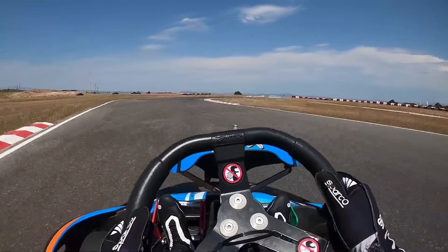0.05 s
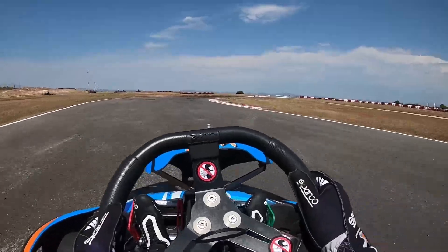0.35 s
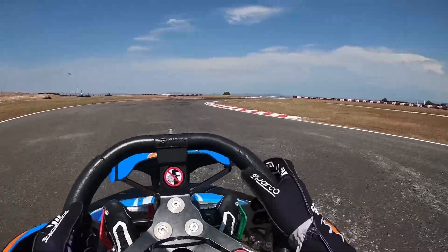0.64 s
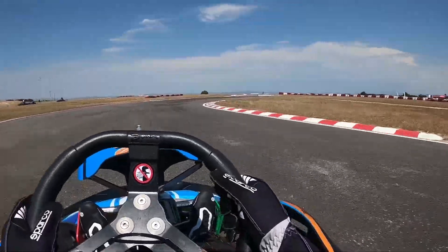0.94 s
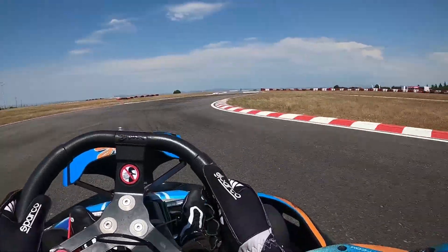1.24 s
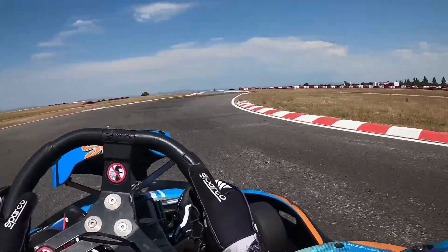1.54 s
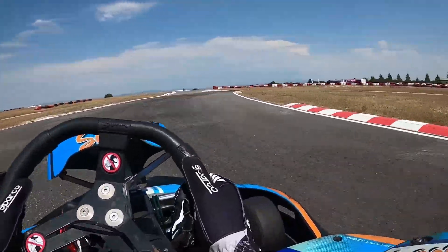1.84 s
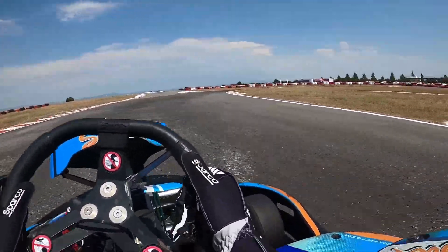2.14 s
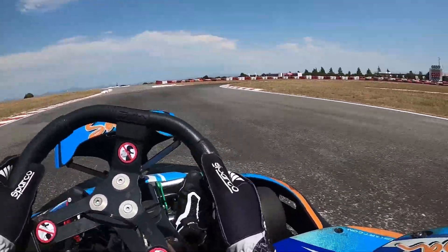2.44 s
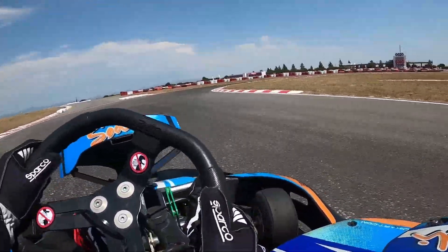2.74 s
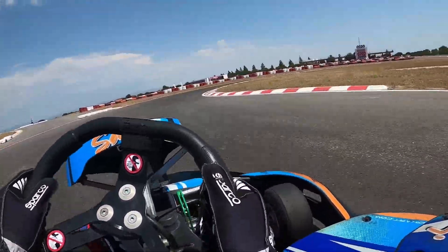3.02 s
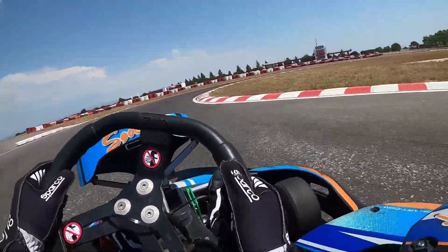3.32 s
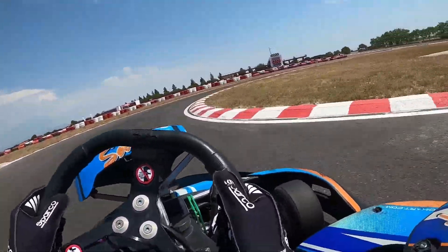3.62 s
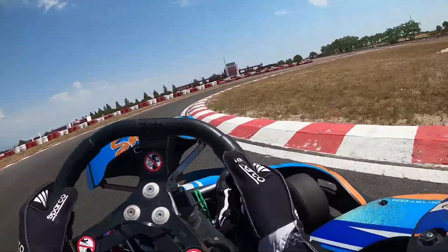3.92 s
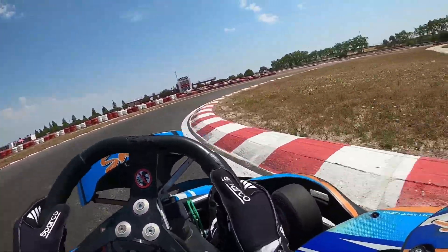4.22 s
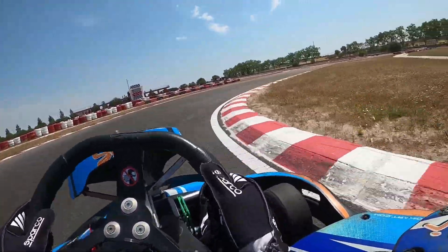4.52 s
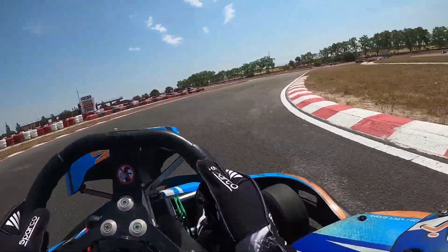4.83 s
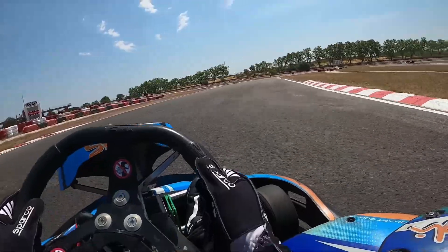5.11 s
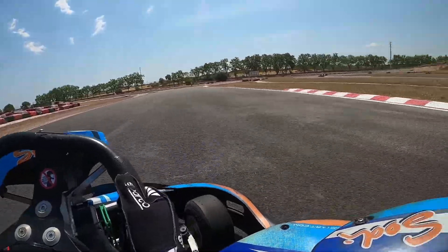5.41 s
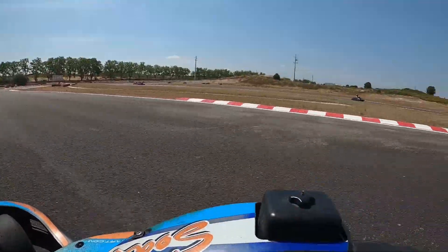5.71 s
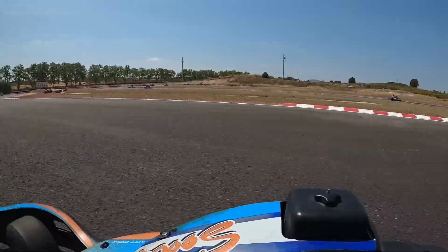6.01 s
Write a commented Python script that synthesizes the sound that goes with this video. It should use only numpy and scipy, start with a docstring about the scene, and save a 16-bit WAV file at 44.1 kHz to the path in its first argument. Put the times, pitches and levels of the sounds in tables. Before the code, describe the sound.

A small racing kart engine throbs throughout, heard on board in the open air, with heavy wind buffeting the microphone and tyres roaring on asphalt. In the first second the chain whines clearly and the frame booms over bumps. The engine rises slightly until about 2 seconds, then drops in pitch, gulps twice and settles into a hollow drone from about 3 seconds. Short, rough, high tyre squeals begin around 1.7 seconds and repeat in a stuttering run, strongest from 3 to 4.5 seconds and gone by 5. Very faint brake hisses come just before 3 seconds, and light grit ticks and scattered plastic knocks dot the corner. A faint, thin whistle lasts from about 4.7 to 5.5 seconds. The plastic bodywork rattles hardest from 5.7 to 6 seconds, as the wind and engine continue.

```python
"""A four-stroke engine throbs under buffeting wind, heard on board a racing kart on a short straight.
Its firings excite resonances of exhaust, fins and airbox and shake the frame; the chain whines, the
tread roars, bumps boom and grit ticks. Off the throttle, through a long corner, the brake pads hiss
and the loaded tyres squeal by stick-slip friction each time the hopping chassis bites.
At the exit the plastic bodywork rattles hardest."""
import sys
import numpy as np
from scipy import signal
from scipy.fft import rfft, irfft, next_fast_len
from scipy.io import wavfile
from scipy.ndimage import uniform_filter1d, map_coordinates

SR = 44100
rng = np.random.default_rng(int(sys.argv[2]) if len(sys.argv) > 2 else 0)


def dump(signal):
    """Clip the signal to [-1, 1] and save it as 16-bit WAV at the path in sys.argv[1]."""
    limited = np.clip(np.atleast_2d(signal).T, -1, 1)
    pcm = np.round(limited * 32767).astype(np.int16)
    wavfile.write(sys.argv[1], SR, pcm)


N = 271656
TIME = np.arange(N) / SR

# engine speed (the crank turns twice per firing): time_s, firing_hz
FIRING_RATE = [(0, 35.15), (.95, 35.65), (1.75, 36.95), (2.1, 36.7), (2.35, 32.3), (3.0, 32.1),
               (3.12, 30.85), (3.33, 30.6), (3.52, 30.0), (3.8, 29.95), (4.2, 29.4), (4.45, 28.9),
               (4.95, 29.05), (5.45, 28.95), (5.7, 29.3), (6.16, 29.55)]
# exhaust strength as the engine pulls: time_s, level_db
EXHAUST_LEVEL = [(0, -27), (1.1, -24), (1.8, -24.5), (2.45, -30.5), (3.5, -21), (4.4, -23.5), (5.3, -26),
                 (6.16, -26.5)]
# resonances of the exhaust and of the cylinder's fins: centre_hz, nominal_width_hz, relative_db
EXHAUST_MODES = [(64.3, 14, 0.5), (92.5, 22, -2.5), (112, 28, -1.5), (170.2, 17, -5), (210.7, 21, -4),
                 (254.8, 33, -1), (291, 26, -3), (328.4, 29, -1), (368.5, 36, -6.5), (416.6, 40, -6)]
FIN_MODES = [(1558, 90, -1), (1680, 51, -3.5), (2170, 79, -9.5)]
# airbox drone, strong once the revs drop: time_s, level_db
AIRBOX_LEVEL = [(0, -50), (1.2, -42), (2.2, -40.5), (3.15, -23), (4.9, -23.5), (5.76, -21.5), (5.89, -33),
                (6.16, -25)]
# airbox gulps as the throttle is feathered: peak_s, level_db
AIRBOX_GULPS = [(2.385, -25.5), (2.599, -21.5)]
# chain whine and its octave: time_s, level_db
CHAIN_LEVEL = [(0, -31.5), (.6, -34.5), (1.1, -45.5), (3.6, -39), (5.2, -41), (5.8, -34.5), (6.16, -33.5)]
CHAIN_OCTAVE_LEVEL = [(0, -42.5), (.65, -38.5), (1.2, -50), (2.8, -50), (3.3, -44), (4.6, -42),
                      (5.4, -46.5), (6.16, -46)]
# eddies at the microphone and rush of the air stream: time_s, level_db
EDDY_LEVEL = [(0, -22), (.55, -22), (.95, -20), (2.45, -17.5), (3.25, -20), (4.4, -15), (5.2, -19),
              (5.9, -15.5), (6.16, -19.5)]
RUSH_LEVEL = [(0, -24.5), (.7, -26), (1.4, -26.5), (2.3, -32), (3.0, -32), (3.7, -35), (5.1, -30.5),
              (5.55, -31.5), (5.88, -27), (6.16, -28)]
# brief swells and dips in the rushing noise: peak_s, change_db
SWELLS_AND_DIPS = [(.66, 3), (.82, 1), (1.0, 3.5), (2.35, -2), (2.41, 4), (2.5, -3), (2.6, 0.5),
                   (2.725, -4), (2.78, 3), (5.97, -1), (6.06, 4)]
# roar of the tread on asphalt: time_s, level_db
ROLL_LEVEL = [(0, -21.5), (2.25, -19.5), (2.58, -24.5), (2.9, -20.5), (4.0, -20), (4.6, -18.5),
              (4.95, -22.5), (6.16, -20)]
# sideways tyre load, relative to the apex: time_s, load_db
CORNERING_LOAD = [(0, -16.5), (1.5, -6.5), (2.12, -10), (2.3, 4), (2.5, -20), (3.0, 4.5), (3.2, -0.5),
                  (3.8, -1.5), (4.45, -1), (4.9, -14), (5.7, -26)]
# chassis vibration forced by the engine and by bumps: time_s, level_db
SHAKE_LEVEL = [(0, -19), (.6, -22), (.85, -27), (1.3, -24), (1.8, -23), (2.3, -30), (3.15, -31.5),
               (3.6, -23), (4.5, -24.5), (5.2, -38.5), (5.9, -28), (6.16, -31)]
BOOM_LEVEL = [(0, -21.5), (.5, -32), (1.1, -28), (1.65, -22), (2.15, -30.5), (2.8, -31), (4.4, -30),
              (5.3, -35), (5.7, -24), (6.16, -25)]
# strongest harmonics of the engine's shaking: multiple_of_firing_rate
SHAKE_HARMONICS = (2, 3, 4, 6, 10)
# their strengths: relative_db
SHAKE_HARMONIC_DB = (0.5, 0, -2.5, -3, -5)
# grit thrown up by the tyres: time_s, level_db
GRIT_LEVEL = [(0, -70), (.4, -73), (.7, -62), (1.9, -66), (2.3, -79), (3.2, -65), (6.16, -68.5)]
# bodywork impacts: start_s, level_db, decay_s
PANEL_BLOWS = [(.98, -28, 0.015), (2.642, -35.5, 0.0046), (2.679, -33, .0093), (2.774, -30, 0.013),
               (3.088, -33, 0.0082), (3.545, -35.5, .012), (4.308, -30.5, .015), (4.574, -34, 0.0043),
               (4.657, -26.5, 0.008), (4.708, -37, .005), (4.776, -34, .003), (4.8, -24, .008),
               (4.836, -33, 0.0037), (4.886, -34, .005), (5.036, -34, 0.0096), (5.171, -26, 0.013),
               (5.722, -29, .005), (5.757, -17.5, .008), (5.772, -24, 0.0043), (5.828, -24.5, .005),
               (5.852, -22, .007), (5.861, -21, 0.0059), (5.879, -24, .006), (5.897, -23, 0.0054),
               (5.911, -27.5, .005), (5.9228, -17, 0.0038), (5.9486, -28, 0.0045), (6.009, -26.5, 0.0068)]
# tyre squeals: start_s, length_s, level_db, pitch_hz
TYRE_SQUEALS = [(1.66, 0.05, -25.5, 1065), (1.775, 0.025, -26, 1090), (1.845, 0.021, -21, 1076),
                (1.89, 0.037, -27, 1083), (1.945, 0.067, -26.5, 1140), (2.015, 0.029, -25.5, 1060),
                (2.1, 0.061, -25.5, 1085), (2.27, 0.053, -30, 1104), (2.395, 0.053, -23.5, 927),
                (2.445, 0.125, -23, 1122), (2.56, 0.027, -23, 900), (2.612, 0.087, -23, 1075),
                (2.765, 0.055, -20.5, 1130), (2.787, 0.017, -20, 949), (2.828, 0.022, -20.5, 949),
                (2.915, 0.07, -23.5, 1095), (2.995, 0.061, -22, 1040), (3.105, 0.045, -27, 1057),
                (3.152, 0.06, -16.5, 1085), (3.212, 0.1, -20, 1118), (3.29, .08, -19, 1090),
                (3.41, 0.092, -18.5, 1082), (3.555, 0.0905, -18.5, 1082), (3.71, 0.093, -16, 1114),
                (3.855, 0.13, -19, 1098), (4.02, 0.14, -20.5, 1093), (4.177, 0.099, -20, 1115),
                (4.315, 0.04, -20.5, 1100), (4.352, 0.013, -14.5, 1116), (4.385, .04, -22.5, 1090),
                (4.452, 0.079, -22.5, 1090), (4.595, 0.085, -22, 1113), (4.74, 0.054, -28, 1132),
                (4.88, 0.058, -30.5, 1085)]
# faint, thin squeaks and one long, thin engine whistle: start_s, length_s, level_db, pitch_hz
SQUEAKS_AND_WHISTLE = [(2.378, 0.057, -45.5, 3880), (2.55, .1, -52, 3640), (2.87, 0.18, -53, 3880),
                       (4.7, 0.83, -42, 1550), (5.682, 0.014, -39, 3880)]
# sprays of grit, touches of the brake pads, rear tyre slides: peak_s, level_db, half_length_s
GRIT_SPRAYS = [(1.025, -58, .012), (1.337, -59, .008), (2.644, -56, .003), (3.092, -58, .01),
               (3.23, -62, .03), (3.4, -60, .02), (3.545, -56, .025), (3.68, -56, .025), (4.03, -59, .025),
               (4.31, -57, 0.024), (4.41, -57, .015), (4.46, -56.5, .018), (4.565, -58, 0.018),
               (5.18, -60, .015), (5.25, -60, .015), (5.685, -60, .013), (5.725, -61, .013),
               (5.757, -57, .008), (5.82, -58, .013)]
PAD_TOUCHES = [(2.686, -56, .008), (2.84, -60, .03), (2.902, -54, .018), (2.99, -56, .025),
               (3.12, -58, .03)]
REAR_SLIDES = [(2.83, -25.5, 0.037), (2.95, -26, 0.066), (3.03, -29, 0.044), (3.13, -27.5, .04),
               (3.56, -23.5, .04)]
# spectral shapes of the noise sources: frequency_hz, relative_density_db
EDDY_SPECTRUM = [(12, -6.5), (25, -4), (48, -2), (80, -3.5), (120, -14), (170, -13), (400, -40.5)]
RUSH_SPECTRUM = [(150, 4.5), (400, 25.5), (600, 23), (1000, 18.5), (1500, 18.5), (2000, 14), (2500, 8),
                 (3000, 1.5), (4100, 1.5), (5100, -8.5), (6000, -14.5), (7700, -38), (10000, -41.5),
                 (13000, -56)]
ROLL_SPECTRUM = [(80, -9), (150, -3.5), (260, -1.5), (400, -2), (480, -7), (590, -13.5), (730, -14.5),
                 (900, -12.5), (1100, -11), (1400, -24.5), (3000, -60), (4000, -44), (5700, -51),
                 (8000, -67.5)]
SCRUB_SPECTRUM = [(700, -16.5), (840, 6), (980, 8.5), (1350, 0), (1680, -1.5), (1900, -1), (2250, -2),
                  (2700, -28.5), (4000, -43.5)]
GRIT_SPECTRUM = [(3500, -6.5), (4400, 2), (5700, 6), (6800, -8), (8000, -16.5), (9200, -13), (10300, -13),
                 (12000, -28.5)]
PANEL_SPECTRUM = [(300, -1), (900, 12.5), (1600, 5), (2200, -1), (2800, -1), (4000, -7.5), (5500, -22.5),
                  (8000, -49.5)]
PAD_SPECTRUM = [(3500, -3), (5000, 3.5), (7000, -8), (8200, -16.5), (9500, -28)]


def undb(db):
    """Decibels to amplitude ratio."""
    return 10 ** (np.asarray(db) / 20)


def unit(x):
    """Normalisation to rms 1."""
    return x / np.sqrt(np.mean(x ** 2))


def noise():
    """Gaussian white noise."""
    return rng.standard_normal(N)


def walk(rate_hz):
    """Smooth random modulation of rms 1, changing about rate_hz times a second."""
    steps = np.interp(TIME * rate_hz, np.arange(N), noise())
    return unit(uniform_filter1d(steps, int(SR / rate_hz / 2) + 1))


def curve(table):
    """Linear interpolation through rows of time_s, value."""
    return np.interp(TIME, *np.transpose(table))


def bursts(table):
    """Gaussian envelopes from rows of peak_s, level_db, half_length_s."""
    return sum(undb(db) * np.exp(-((TIME - s) / half) ** 2) for s, db, half in table)


def colour(x, spectrum):
    """Spectral shaping, falling a further 12 dB per octave beyond the table's ends; rms 1."""
    hz, db = np.transpose(spectrum)
    size = next_fast_len(N)
    bin_hz = np.maximum(np.arange(size // 2 + 1) * SR / size, 1)
    skirts = np.minimum(bin_hz / hz[0], 1) ** 2 * np.minimum(hz[-1] / bin_hz, 1) ** 2
    gain = skirts * undb(np.interp(np.log(bin_hz), np.log(hz), db))
    return unit(irfft(rfft(x, size) * gain, size)[:N])


def resonate(x, hz, width_hz):
    """Two identical two-pole resonators in cascade, each width_hz wide; gain 1 at the centre."""
    b, a = signal.iirpeak(hz, hz / width_hz, fs=SR)
    return signal.lfilter(b, a, signal.lfilter(b, a, x))


def ringing(hz, width_hz):
    """Random excitation of a resonance gives narrow-band noise; rms 1."""
    return unit(resonate(noise(), hz, width_hz))


def harmonic(cycle, order, waver_rad, flutter_db):
    """A multiple of the firing rate under random phase and amplitude modulation; rms 1."""
    phase = 2 * np.pi * order * cycle + waver_rad * walk(35)
    return unit(np.sin(phase) * undb(flutter_db * walk(25)))


def firings(cycle, modes, scatter_db):
    """Impulse excitation: one pulse per firing, of varying strength, rings a set of modes."""
    count = np.floor(cycle)
    pulses = np.diff(count, prepend=count[0]) * undb(scatter_db * walk(30))
    return unit(sum(undb(db) * resonate(pulses, hz, 1.3 * width) for hz, width, db in modes))


def engine(cycle):
    """Periodic excitation: the firings ring the low modes of the exhaust and the high ones of the fins."""
    exhaust = undb(curve(EXHAUST_LEVEL)) * firings(cycle, EXHAUST_MODES, scatter_db=1.9)
    fins = undb(-43) * firings(cycle, FIN_MODES, scatter_db=1.5)
    return exhaust + fins


def airbox(cycle, firing_hz, centre_hz=472, half_width_hz=35, gulp_half_s=0.079):
    """Cavity resonance favours the nearer of two firing harmonics, over a rough rush of intake air."""
    orders = (14, 15)
    weights = [(1 + ((k * firing_hz - centre_hz) / half_width_hz) ** 2) ** -2 for k in orders]
    rush = ringing(hz=453, width_hz=65)
    tones = [harmonic(cycle, k, waver_rad=0.38, flutter_db=1.9) for k in orders]
    drone = sum(weight * tone for weight, tone in zip(weights, tones)) / np.hypot(*weights)
    drone_db = curve(AIRBOX_LEVEL)
    rush_db = -27.5 + 0.35 * (drone_db - drone_db.max())
    gulps = bursts((s, db, gulp_half_s) for s, db in AIRBOX_GULPS)
    return np.hypot(undb(drone_db), gulps) * drone + np.hypot(undb(rush_db), gulps) * rush


def chain(cycle):
    """Meshing tone and its octave: a 14-tooth sprocket engages the chain 28 times per firing."""
    mesh = undb(curve(CHAIN_LEVEL)) * harmonic(cycle, 28, waver_rad=0.8, flutter_db=0.5)
    octave = undb(curve(CHAIN_OCTAVE_LEVEL)) * harmonic(cycle, 56, waver_rad=1.7, flutter_db=1.4)
    return mesh + octave


def wind(cycle, firing_hz, reference_hz=30.93, throb_db=1.0, flicker_db=1.5, lump_db=1.0):
    """Turbulence: eddies buffet the microphone; the rush flickers and throbs with the engine's shaking."""
    # above the reference firing rate the eddies pass faster and their spectrum shifts up
    eddy_position = np.cumsum((firing_hz / reference_hz) ** 1.2)
    eddies = map_coordinates(colour(noise(), EDDY_SPECTRUM), [eddy_position], mode="mirror")
    buffet = eddies * undb(curve(EDDY_LEVEL) + lump_db * walk(13))
    modulation_db = throb_db * np.cos(2 * np.pi * cycle) + flicker_db * walk(70)
    rush = colour(noise() * undb(modulation_db), RUSH_SPECTRUM) * undb(curve(RUSH_LEVEL))
    change_db = sum(db * np.exp(-((TIME - s) / 0.032) ** 2) for s, db in SWELLS_AND_DIPS)
    return (buffet + rush) * undb(change_db)


def tyres(cycle, throb_db=0.16, grain_db=3.0, patchy_db=2.0):
    """Contact noise: the tread rolls and scrubs under cornering load, modulated by each power stroke."""
    scrub_db = -33 + 0.29 * curve(CORNERING_LOAD) + patchy_db * walk(12)
    tug = undb(throb_db * np.cos(2 * np.pi * cycle))
    roll = colour(noise() * tug, ROLL_SPECTRUM) * undb(curve(ROLL_LEVEL))
    friction = noise() * tug * undb(grain_db * walk(90))
    return roll + colour(friction, SCRUB_SPECTRUM) * undb(scrub_db)


def shake(cycle):
    """Forced vibration: crank and piston drive the chassis, unsteadily as the road jolts it."""
    throb = sum(undb(db) * harmonic(cycle, k, waver_rad=0.78, flutter_db=4.5)
                for k, db in zip(SHAKE_HARMONICS, SHAKE_HARMONIC_DB))
    return unit(throb) * undb(curve(SHAKE_LEVEL))


def chassis_boom():
    """Mass-spring resonance: bumps set the frame booming on its soft tyres."""
    return ringing(hz=97.1, width_hz=55) * undb(curve(BOOM_LEVEL))


def grit(per_second=800, spread_db=2.5):
    """Shot noise: tiny stones strike the chassis at random, most faintly, now and then in a spray."""
    hits = rng.random(N) < per_second / SR
    strength = undb(spread_db * np.minimum(rng.exponential(size=N), 4))
    envelope = np.hypot(undb(curve(GRIT_LEVEL)), bursts(GRIT_SPRAYS))
    return colour(hits * strength, GRIT_SPECTRUM) * envelope


def rattles(chatter_db=3.5, tap_db=17):
    """Damped impacts: plastic panels collide with a hard tap, then chatter in exponential decay."""
    blows = sum(undb(db) * (TIME >= s) * np.exp(-np.maximum(TIME - s, 0) / decay_s)
                for s, db, decay_s in PANEL_BLOWS)
    taps = undb(tap_db) * np.maximum(np.diff(blows, prepend=0), 0)
    chatter = blows * noise() * undb(chatter_db * walk(900))
    return colour(taps + chatter, PANEL_SPECTRUM) * np.sqrt(np.mean(blows ** 2))


def rough_tones(table, grain_hz, rough_db, overtone_db, edge_s, jitter, wander, sag, rise):
    """Frequency and amplitude modulation: each tone dips, climbs and trembles at random."""
    out = np.zeros(N)
    # jitter, wander, sag and rise are fractions of the pitch; tones alternate between two textures
    textures = [(1 + jitter * walk(grain_hz) + wander * walk(70), undb(rough_db * walk(grain_hz / 2)))
                for _ in range(2)]
    for k, (start_s, length_s, level_db, pitch_hz) in enumerate(table):
        tremble, flutter = textures[k % 2]
        live = np.abs(TIME - start_s - length_s / 2) < length_s / 2 + edge_s
        t = TIME[live] - start_s
        progress = np.clip(2 * t / length_s - 1, -1, 1)
        hz = pitch_hz * (1 - sag * np.cos(np.pi * progress) + rise * progress)
        phase = 2 * np.pi * np.cumsum(hz * tremble[live]) / SR
        tone = np.sin(phase) + undb(overtone_db) * np.sin(2 * phase)
        fade = np.clip((np.minimum(t, length_s - t) + edge_s) / (2 * edge_s), 0, 1)
        out[live] += undb(level_db) * np.sin(np.pi / 2 * fade) ** 2 * unit(flutter[live] * tone)
    return out


def tyre_squeal(tread_hz=1092, width_hz=200):
    """Stick-slip: rubber squeals, shaken by the road's grain, and rasps as the tread's edge tears."""
    squeal = rough_tones(TYRE_SQUEALS, grain_hz=340, rough_db=2.0, overtone_db=-33, edge_s=0.017,
                         jitter=0.024, wander=0.009, sag=0.011, rise=0.006)
    envelope = np.sqrt(uniform_filter1d(squeal ** 2, size=1500) + 1e-12)
    tear = undb(-12) * ringing(tread_hz, width_hz)
    octave = undb(-21) * ringing(2 * tread_hz, 2 * width_hz)
    scrape = undb(-18) * colour(noise(), SCRUB_SPECTRUM)
    return squeal + envelope * (tear + octave + scrape)


def squeaks_and_whistle():
    """Modulated tones: faint, thin squeaks and one long, thin whistle of an engine-excited resonance."""
    return rough_tones(SQUEAKS_AND_WHISTLE, grain_hz=517, rough_db=3.5, overtone_db=-33.5, edge_s=0.013,
                       jitter=0.036, wander=0.006, sag=0.0028, rise=0.004)


def brake():
    """Sliding friction: the pads brush the disc in short, dry hisses on the way into the corner."""
    return colour(noise(), PAD_SPECTRUM) * bursts(PAD_TOUCHES)


def rear_slide():
    """Friction excites a lower, hoarser resonance of the tread while the rear steps out."""
    return ringing(hz=938, width_hz=180) * bursts(REAR_SLIDES)


def scene():
    """Superposition in open air of sources that travel with the microphone; one channel."""
    firing_hz = curve(FIRING_RATE)
    cycle = np.cumsum(firing_hz * (1 + 0.0018 * walk(12))) / SR  # firings elapsed
    drive = engine(cycle) + airbox(cycle, firing_hz) + chain(cycle)
    air_and_road = wind(cycle, firing_hz) + tyres(cycle)
    frame = shake(cycle) + chassis_boom() + grit() + rattles()
    corner = tyre_squeal() + squeaks_and_whistle() + brake() + rear_slide()
    return (drive + air_and_road + frame + corner)[None]


def record(dry, knee=0.25, squeeze=0.57, makeup_db=1.5, cutoff_hz=12500):
    """Dynamic compression holds down the loudest moments; a low-pass filter cuts the top."""
    power = uniform_filter1d(uniform_filter1d(dry ** 2, size=500), size=500)
    envelope = np.sqrt(power + 1e-12)
    held = undb(makeup_db) * dry / (1 + (envelope / knee) ** 2) ** squeeze
    return signal.sosfilt(signal.ellip(8, 0.2, 70, cutoff_hz, fs=SR, output="sos"), held)


dry = scene()
out = record(dry)
dump(out)
```